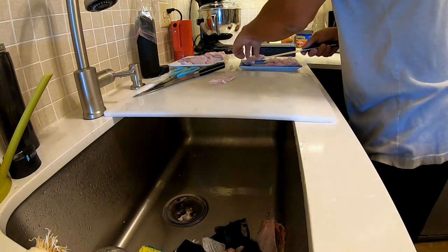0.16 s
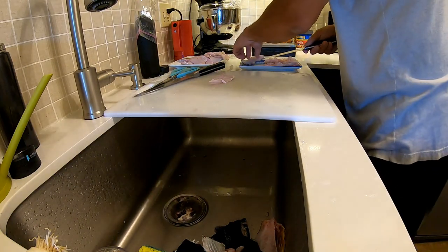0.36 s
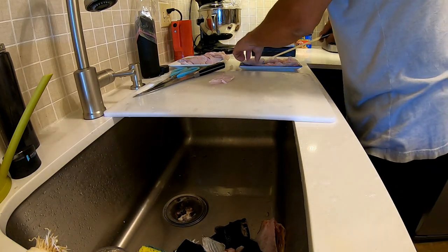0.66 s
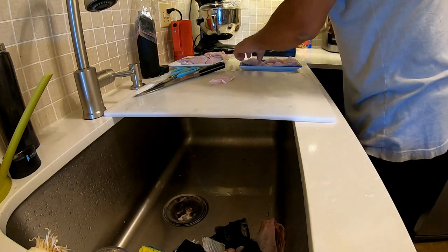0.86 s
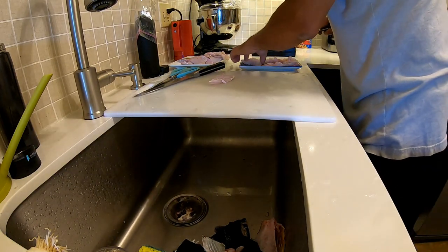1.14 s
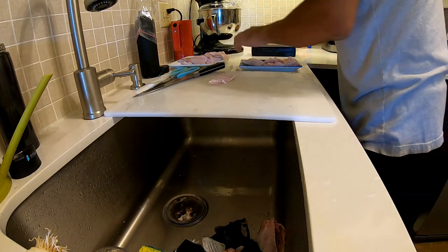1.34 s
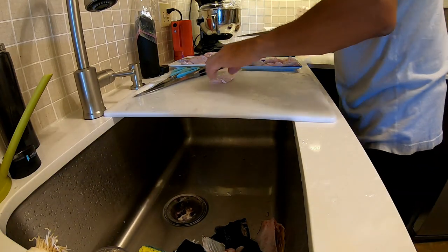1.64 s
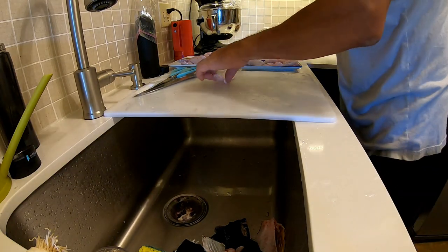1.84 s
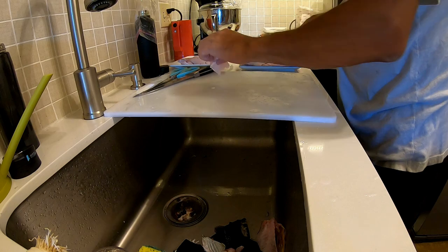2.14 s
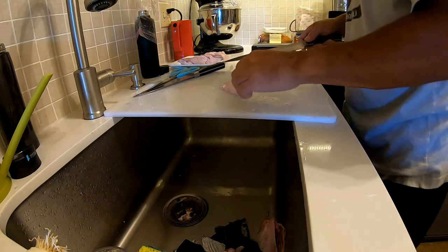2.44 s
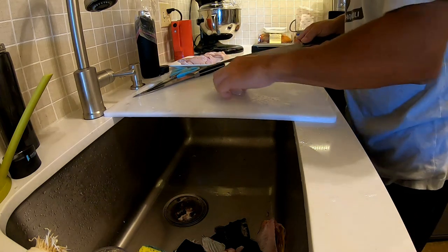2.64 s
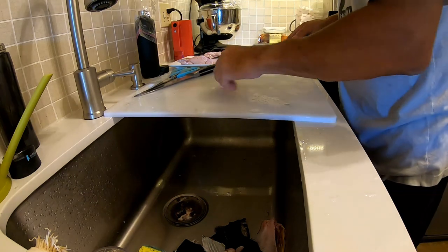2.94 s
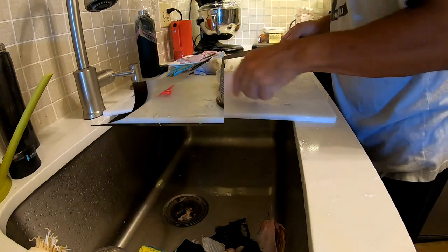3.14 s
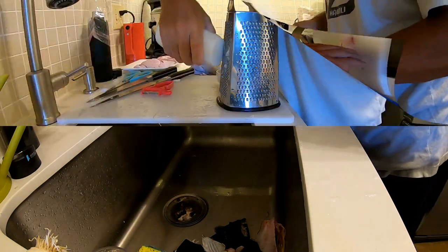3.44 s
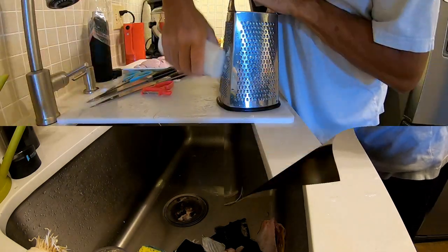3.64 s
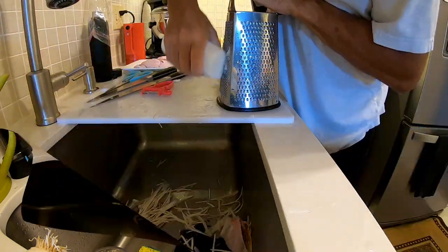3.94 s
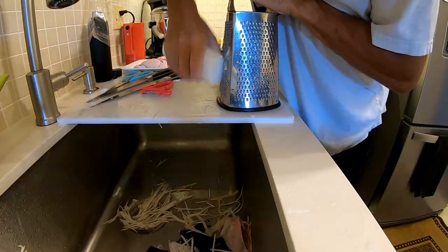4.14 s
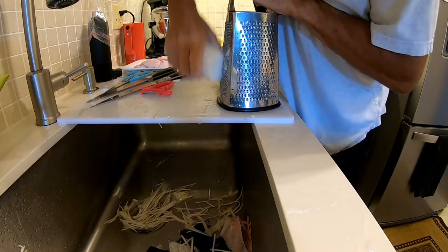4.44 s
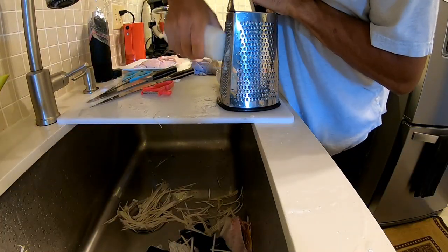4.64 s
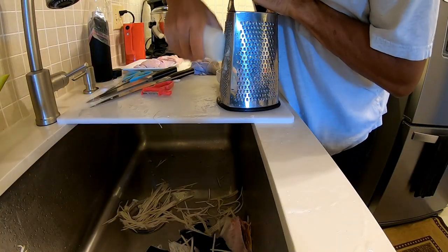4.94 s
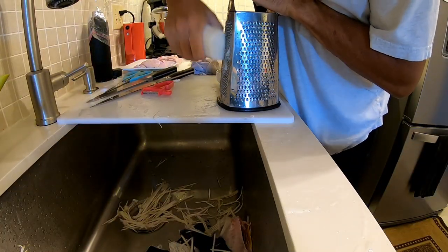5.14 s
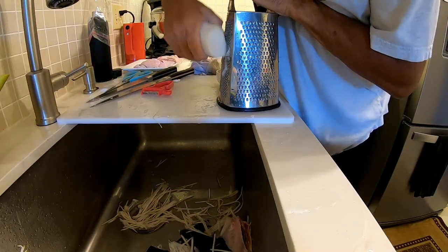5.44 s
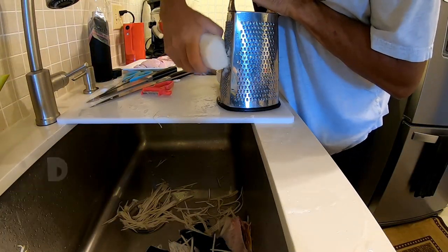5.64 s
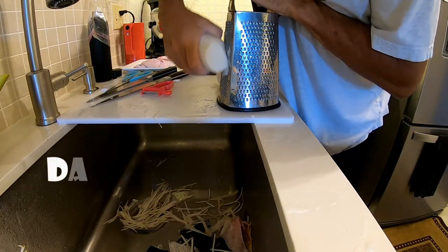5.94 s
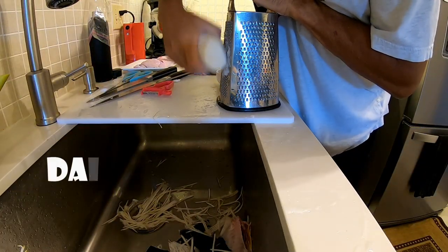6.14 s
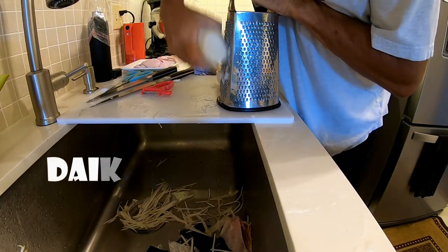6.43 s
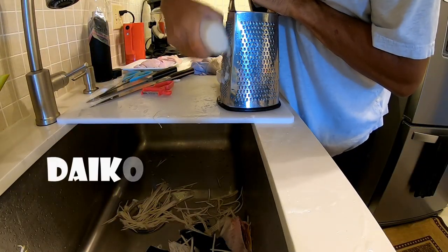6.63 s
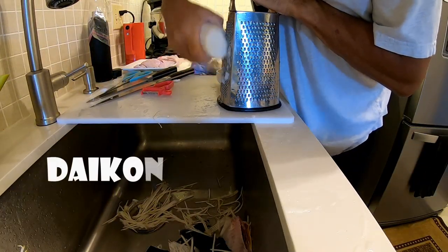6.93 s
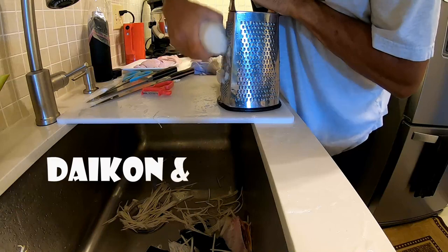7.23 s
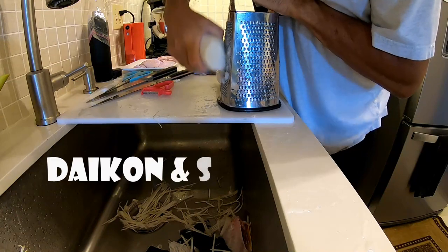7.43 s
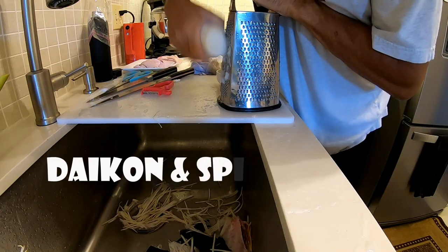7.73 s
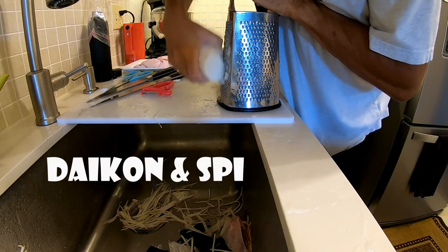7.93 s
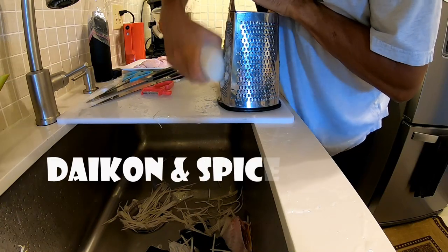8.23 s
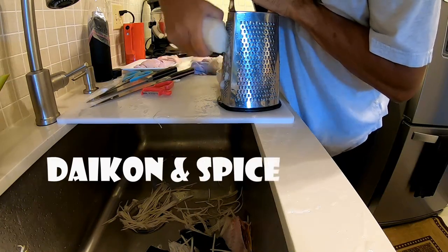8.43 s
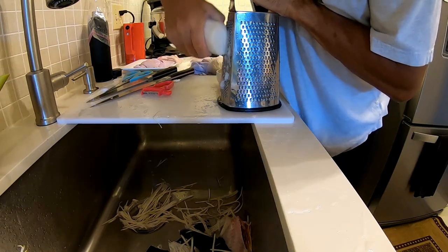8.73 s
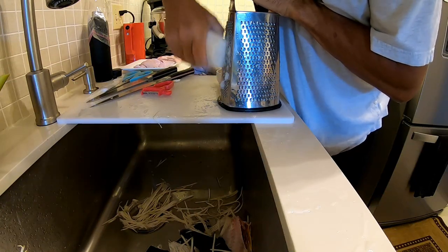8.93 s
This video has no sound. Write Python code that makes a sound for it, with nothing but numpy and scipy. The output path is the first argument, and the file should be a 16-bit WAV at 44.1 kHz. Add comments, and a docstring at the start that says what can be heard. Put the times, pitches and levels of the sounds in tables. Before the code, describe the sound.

A close microphone in a small, tiled kitchen. From 0 to about 3.4 seconds an appliance hums low and slightly wavering, with dull air noise. At 0.2 s something is set down with a short, hard clack; faint dry brushing follows around 0.5 to 0.7 s. Near 1.9 to 2.0 s come a muffled thud and tiny ticks, at 2.4 s another knock, and from 2.8 to 3.0 s a run of soft low bumps as a hand wipes the board. Around 3.4 s the hum drops away and grating begins, first lightly with a brief metallic groan at 3.55 s, reaching full strength by 4 s. Rapid rasping strokes, about seven a second, hiss and ring the sheet metal while the counter shudders beneath. Strokes vary in bite and brightness, with small cracks near 6.25, 7.3 and 8.5 s, continuing to the end around 9.1 s.

```python
"""A radish is rubbed up and down a metal box grater, about seven strokes a second: chance cuts of the
teeth make the hiss, narrow modes ring as sheet metal, and each push shakes low modes of the counter.
Before that, things are set down (decaying noise through modes, over a sine thud) and a hand wipes the
cutting board (band noise and low bumps). An appliance hums: low resonant noise, tones and air noise."""
import sys
import numpy as np
from scipy import signal
from scipy.fft import rfft, irfft, next_fast_len
from scipy.io import wavfile

SR = 44100
rng = np.random.default_rng(int(sys.argv[2]) if len(sys.argv) > 2 else 0)


def generate_wav(sig):
    """Save sig (samples, or channels by samples) to the path in sys.argv[1] as 16-bit PCM at SR."""
    pcm = np.round(np.clip(np.atleast_2d(sig).T, -1, 1) * 32767).astype(np.int16)
    wavfile.write(sys.argv[1], SR, pcm)


N = 400428

# Strokes: turn t/s, level at the turn/dB, level at full speed/dB, place of full speed/0-1,
# body and edge relative to that level/dB, ring level/dB, place of ring peak/0-1,
# push level/dB, place of hardest push/0-1; the last row only ends the last stroke
STROKES = [(3.35, -79, -63.5, 0.65, 7, -9, -61, 0.91, -44, 0.67),
           (3.455, -72, -51, 0.57, 1, -10, -50, 0.49, -41, 0.86),
           (3.603, -69, -49, 0.59, 1, -6.5, -51, 0.56, -34, 0.93),
           (3.748, -68, -47.5, 0.44, 3.5, -5.5, -44.5, 0.39, -38, 0.77),
           (3.887, -62.5, -44, 0.49, 3, -6.5, -50.5, 0.66, -34.5, 1),
           (4.045, -56.5, -40.5, 0.4, -0.5, -7, -38.5, 0.35, -32, 0.93),
           (4.2, -59, -41, 0.53, 3, -6.5, -46.5, 0.7, -32, 0.95),
           (4.343, -53, -42.5, 0.57, 0, -6, -45, 0.56, -28.5, 0.38),
           (4.496, -53, -43, 0.42, 2, -8.5, -43.5, 0.77, -33, 0.83),
           (4.636, -54.5, -43.5, 0.56, 3.5, -3.5, -41.5, 0.65, -31.5, 0.99),
           (4.786, -56.5, -45.5, 0.42, 3, -7, -49, 1, -32, 0.44),
           (4.911, -57.5, -46, 0.66, 0.5, -4.5, -47.5, 0.58, -31, 0.97),
           (5.051, -60, -44.5, 0.51, 6.5, -3, -41.5, 0.64, -33.5, 0.23),
           (5.193, -53, -41, 0.57, -4, -5.5, -51, 0.69, -30, 0.5),
           (5.328, -62, -43, 0.42, 3, -3.5, -41, 0.38, -30.5, 1),
           (5.485, -62, -41.5, 0.51, 1, -6.5, -48, 0.68, -30.5, 0.58),
           (5.634, -81, -42.5, 0.46, 1.5, -4, -51, 0.42, -31, 0.66),
           (5.775, -66, -45.5, 0.32, -3, -4.5, -48.5, 0.43, -38.5, 1),
           (5.916, -75, -44.5, 0.4, 2, -2.5, -53, 0.97, -36.5, 1),
           (6.061, -64.5, -41, 0.52, -5.5, -6, -46, 0.62, -35.5, 0.85),
           (6.218, -66, -41.5, 0.47, 3.5, -4.5, -43, 0.67, -40.5, 0.51),
           (6.36, -54.5, -40.5, 0.53, 0.5, -6, -41.5, 0.44, -33, 0.92),
           (6.515, -57, -44.5, 0.54, 4.5, -2, -43.5, 0.32, -30, 0.47),
           (6.682, -62.5, -42.5, 0.42, 3.5, -1, -38.5, 0.45, -31, 0.67),
           (6.846, -59.5, -42.5, 0.49, 5, -6, -47, 0.58, -30.5, 0.75),
           (6.995, -65, -42.5, 0.37, 1, -2.5, -47, 0.35, -32, 0.69),
           (7.144, -64, -41.5, 0.46, 4.5, -1.5, -41, 0.47, -28.5, 1),
           (7.285, -72, -40, 0.39, 0, -4.5, -43.5, 0.31, -27.5, 0.81),
           (7.428, -58.5, -43.5, 0.49, 3.5, -6.5, -45, 0.65, -34.5, 0.89),
           (7.564, -60, -41.5, 0.38, -4, -5, -44.5, 0.45, -31.5, 0.65),
           (7.698, -60, -45.5, 0.5, 5.5, -5.5, -46, 0.81, -32.5, 0.64),
           (7.822, -62, -44, 0.31, -1.5, -3.5, -49, 0.24, -35, 0.73),
           (7.965, -62.5, -43, 0.42, 7, -2, -36, 0.3, -33.5, 0.19),
           (8.134, -57.5, -45, 0.37, 1.5, -1, -45, 0.23, -31, 1),
           (8.279, -61, -42.5, 0.68, 0.5, -3.5, -41, 0.57, -31, 0.87),
           (8.433, -60.5, -41.5, 0.34, 1.5, -4, -46, 0.4, -33.5, 1),
           (8.598, -56, -45.5, 0.5, 2, -5.5, -45, 0.45, -34, 0.8),
           (8.721, -62, -44.5, 0.42, 0.5, 0, -49, 0.59, -33.5, 0.83),
           (8.882, -64, -45.5, 0.52, 0, -1, -57, 0.37, -40.5, 0.62),
           (9.033, -63, -44, 0.99, -2, 1.5, -48, 0.8, -25.5, 0.74),
           (9.17, -25, -42, 0.5, 0, 0, -48, 0.5, -35, 0.5)]
# Sheet-metal modes of the grater: f/Hz, width/Hz, level/dB
GRATER_MODES = [(512, 22, -1), (652, 12, -6), (740, 31, -1), (955, 36, 2.5), (2086, 130, -6.5),
                (2323, 60, -1), (2600, 39, -6.5), (2946, 45, -3), (3104, 93, -1)]
# Spectrum imposed by the teeth: f/Hz, level/dB
TEETH_SPECTRUM = [(150, -15.5), (250, 0), (500, -4), (960, -10), (1300, -15), (1700, -17.5), (3050, -17),
                  (5000, -22.5), (7880, -26.5), (10800, -32.5)]
# Short boosts of the cutting level, some abrupt onsets, some soft swells:
# t/s, peak level/dB, rise per 20 dB/s (at least 0.001 is used)
BOOSTS = [(3.479, -38, -0.04), (3.632, -30, 0.01), (4.938, -29, .03), (5.3566, -28.5, 0.1),
          (5.5045, -28, 0.07), (5.66, -25, 0.02), (5.9436, -38, 0.1), (6.0906, -34, 0.1),
          (6.248, -28, 0.05), (6.536, -28.5, -0.33), (6.6966, -33, -0.1), (6.894, -24.5, 0),
          (7.0183, -31, .002), (7.1674, -28.5, -0.01), (7.318, -33, 0.26), (7.5832, -30, 0.04),
          (7.721, -32, -0.3), (7.8386, -39, 0.1), (7.982, -33, .002), (8.3108, -29, .004),
          (8.6258, -27.5, -0.75), (8.9135, -35, -0.2)]
BOOST_CREST_DB, BOOST_FADE_S = 19, 0.11   # peak over rms; fade per 20 dB
# One region of the rasp surges as the radish digs in:
# t/s, boost/dB, centre f/Hz, swell per 20 dB/s, fade per 20 dB/s
SURGES = [(3.49, 2, 1890, 0.023, 0.066), (3.79, 4.4, 2300, 0.038, 0.056), (4.145, 3.2, 2370, 0.086, 0.03),
          (4.735, 7.6, 2420, 0.11, 0.075), (4.99, 3.6, 2370, 0.098, 0.041), (5.12, 1.7, 2850, 0.18, 0.07),
          (5.4, 4.2, 610, 0.087, 0.026), (6.6, 4.9, 596, 0.074, 0.11), (6.62, 1.2, 1890, 0.048, 0.038),
          (6.76, 1.4, 3070, 0.098, 0.071), (7.072, 2.7, 2570, 0.023, 0.079),
          (7.223, 1.4, 3700, 0.088, 0.021), (7.32, 1.6, 3030, 0.021, 0.03), (7.865, 1.3, 3050, 0.037, 0.05),
          (8.03, 1.2, 2150, 0.14, 0.033), (8.04, 1.8, 4970, 0.077, 0.058), (8.17, 2, 2900, 0.026, 0.085),
          (8.35, 5, 630, 0.11, 0.038), (8.36, 0.88, 2040, 0.11, 0.039), (8.485, 4.8, 3370, 0.016, 0.038),
          (8.79, 4.7, 3840, 0.069, 0.23)]
SURGE_WIDTH_HZ = 460
# Small sharp cracks, most of them fibres on the teeth: t/s, peak level/dB
SNAPS = [(1.432, -64), (6.253, -27), (7.3175, -32), (8.4805, -21)]
# Strongest pair of sheet modes, flaring with single strokes: f/Hz, width/Hz, level/dB
RING_MODES = [(1394, 43, 4.5), (1441, 36, 7)]
RING_WANDER_DB = 2.5   # each mode of the pair comes and goes on its own
# Sink of ring and push at the turns; the smaller the flatness, the more pointed the swell
RING_DIP_DB, RING_FLATNESS = 18, 0.5
PUSH_DIP_DB, PUSH_FLATNESS, PUSH_WAVER_DB = 5, 0.28, 0.5
# The empty grater groans under the first full stroke; swell and fade per 20 dB
GROAN_HZ, GROAN_S, GROAN_DB, GROAN_SWELL_S, GROAN_FADE_S = 652, 3.555, -43, 0.078, 0.062
# Low resonances of counter and room: f/Hz, width/Hz, hum level/dB, push level/dB
LOW_MODES = [(45, 17, -2, -6), (87.4, 8.3, 0, -3.5), (118.4, 13.9, 1, 2), (176.3, 22, -2.5, -7.5),
             (209, 41, -12, -11.5), (238.44, 8.9, -3, -8.5), (310.4, 18, -10, -9.5),
             (373.5, 13.7, -8, -16.5), (462.7, 23, -11, -21.5)]
# Knocks of things set down, and low bumps while the board is brushed:
# t/s, peak level of middle band/dB, thud/dB, body/dB, edge/dB, rise/s, t60/s, number of the mode set
KNOCKS = [(0.1768, -37.5, -47, -30, -94, 0.0056, 0.2, 0), (0.226, -50.5, -55, -54, -98, 0.0036, 0.17, 0),
          (1.886, -61, -27, -45, -88, 0.0068, 0.24, 1), (1.905, -43, -27, -34, -59, 0.013, 0.14, 1),
          (1.956, -67, -34.5, -51, -55, .0005, 0.11, 3), (1.986, -69, -69, -55, -46.5, .0004, 0.055, 3),
          (2.0023, -68, -70, -61, -49.5, .0004, 0.19, 3), (2.427, -42, -31, -43, -47, 0.0022, 0.13, 2),
          (2.432, -52, -25.5, -52, -51, 0.0044, 0.26, 3), (2.773, -69, -28, -46.5, -74, 0.0018, 0.11, 1),
          (2.857, -58, -32.5, -44, -84, 0.017, 0.2, 1), (2.886, -58, -31, -44.5, -80, 0.003, 0.16, 1),
          (2.916, -59, -30.5, -57, -82, 0.0027, 0.12, 1), (2.946, -68, -34, -60, -82, 0.003, 0.071, 1),
          (2.982, -70, -40, -66, -84, 0.003, 0.059, 1)]
# Mode sets of the knocks: f/Hz, width/Hz, level/dB; the last has none: bare ticks, or a plain thud
OBJECT_MODES = [
    [(645, 140, -4), (785, 110, -3), (1340, 100, -8), (1800, 93, 1.5), (1960, 80, 2), (2230, 99, -5),
     (2585, 70, 3), (3200, 35, 2.5), (3890, 68, -1)],
    [(340, 19, 10), (504, 26, 4.5), (673, 39, 0), (1150, 25, -6), (1550, 90, -14), (2670, 56, -4),
     (3500, 90, -3), (4170, 120, -4), (5400, 590, -1)],
    [(338, 40, 8), (1350, 60, -6), (1910, 45, -7), (2470, 49, -3), (2890, 100, -7), (3850, 50, 2),
     (4060, 80, 2), (5140, 230, 1), (6660, 100, 0)],
    [],
]
# The board gives under each contact
THUD_HZ, THUD_UPPER_HZ, THUD_UPPER_DB, THUD_RISE_S, THUD_T60_S = 140.5, 316, -7, 0.005, 0.042
# Hand and scraps brush the board:
# loudest t/s, dull level/dB, bright level/dB, swell per 20 dB/s, fade per 20 dB/s
BRUSHES = [(.5, -68, -84.5, 0.85, 0.35), (.69, -66, -79, 0.029, 0.096), (1.35, -72, -100, 0.025, 0.11),
           (1.45, -77, -80, 0.061, 0.12), (1.68, -68.5, -76, 0.1, 0.14), (1.95, -69, -66.5, 0.071, 0.2),
           (2.5, -75, -71.5, 0.21, 0.064), (2.63, -75, -74, 0.13, 0.062), (2.778, -66.5, -74, 0.008, 0.23),
           (2.9, -60, -82, 0.11, 0.077), (3.32, -75, -76, 0.27, 0.13)]
# Appliance: t/s, hum level/dB, air noise level/dB, treble hiss level/dB
APPLIANCE_LEVELS = [(0, -46, -54.5, -85), (.33, -42.5, -53.5, -92), (1.3, -45.5, -56, -100),
                    (1.75, -46.5, -57.5, -103), (2.1, -48, -58, -83.5), (2.6, -48.5, -59, -84),
                    (2.95, -46.5, -58.5, -82), (3.2, -55, -58.5, -81), (3.37, -48, -61, -82),
                    (3.5, -77, -92, -93), (3.6, -87, -99, -110)]
HUM_WAVER_DB = 1
# Spectrum of the air noise: f/Hz, level/dB
AIR_SPECTRUM = [(150, 0), (235, 11.5), (266, -4), (357, -6), (695, -22.5), (3620, -41), (6000, -55.5),
                (9000, -97)]
# Motor tones: f/Hz, mean level/dB rms
TONES = [(87.5, -55.5), (119, -55.5), (236.9, -52)]
KITCHEN_DB, KITCHEN_T60_S = -13, 0.18
# Side over mid, before the opening is applied: f/Hz, level/dB
SIDE_SPECTRUM = [(40, -38), (130, -48), (300, -25.5), (600, -15), (1200, -11), (2500, -12), (5000, -8.5),
                 (10500, -2.5)]
# Opening of the stereo image: t/s, side level/dB
OPENING = [(0, -16), (.5, -30), (1.2, -1), (2.0, 6), (3.2, 9), (3.65, -9), (4.5, -7.5), (7.5, -8.5),
           (9.08, 2)]
# Side over mid for the share that does not open and close: f/Hz, level/dB
STEADY_SIDE_SPECTRUM = [(40, -37.5), (150, -57), (300, -59), (600, -48)]
CUTOFF_HZ = 11130   # edge of the stop band


def grater():
    """Impulsive excitation of plate modes: thousands of tiny cuts a second hiss and ring the sheet metal."""
    level, speed, body_db, edge_db = stroke_db(flatness=1.05)
    sizes = from_db(0.39 * rng.exponential(1, N)) * rng.standard_normal(N)
    happens = rng.random(N) < 12000 / SR   # 12000 cuts a second on average
    cuts = rms_one(sizes * happens) * boosted(level + 0.44 * drift(10.2))
    # each mode's drive wavers by chance, several times a second
    drive_db, drive_hz = 3, 9
    metal = sum(resonance(from_db(db + drive_db * drift(drive_hz)) * cuts, hz, width)
                for hz, width, db in GRATER_MODES)
    hiss = coloured(cuts + metal, TEETH_SPECTRUM)
    hiss = hiss + sum(from_db(db) * swell(s, swell_s, fade_s) * resonance(hiss, hz, SURGE_WIDTH_HZ)
                      for s, db, hz, swell_s, fade_s in SURGES)
    # seven bands of the rasp waver in level independently, by chance
    waver_db, waver_hz = 5, 30
    hiss = hiss + sum(from_db(-9.0 + waver_db * drift(waver_hz)) * resonance(hiss, hz, hz / 5)
                      for hz in np.geomspace(600, 5500, num=7))
    body = coloured(hiss, [(900, 0), (1300, -6), (2000, -40)])
    edge = coloured(hiss, [(3000, -40), (4600, -6), (6500, 0)])
    rasp = hiss - body - edge
    rasp_db = 1.1 * drift(12.6) + 0.93 * drift(50)
    body_db = body_db + 0.51 * drift(2.0)
    # the edge level wavers by chance and rises very slightly with speed
    edge_db = edge_db + 0.3 * speed + 0.91 * drift(11.0)
    parts = (rasp, rasp_db), (body, body_db), (edge, edge_db)
    return sum(from_db(db) * part * np.std(cuts) / np.std(part) for part, db in parts)


def stroke_db(flatness):
    """Reciprocating motion: the arm slows to a turn and speeds up again, and the level follows."""
    s, turn_db, full_db, place, body_db, edge_db = np.transpose(STROKES)[:6]
    t = np.arange(N) / SR
    speed, stroke, fastest = arc(place, flatness)
    level = (1 - speed) * np.interp(t, s, turn_db) + speed * full_db[stroke]
    level[t < s[0]] = -120
    return level, speed, np.interp(t, fastest, body_db[:-1]), np.interp(t, fastest, edge_db[:-1])


def arc(place, flatness):
    """A flattened half sine between turns, topped at the given place; also stroke numbers and top times."""
    s = np.array(STROKES)[:, 0]
    tops = s[:-1] + np.clip(place[:-1], .1, .9) * np.diff(s)
    # the phase gains a half from turn to top and a half from top to turn
    phase = np.interp(np.arange(N) / SR, np.sort(np.r_[s, tops]), np.arange(2 * len(s) - 1) / 2)
    shape = np.tanh(flatness * np.abs(np.sin(np.pi * phase))) / np.tanh(flatness)
    return shape, phase.astype(int), tops


def boosted(level_db):
    """Addition of powers: the gain of the cutting with its short boosts."""
    boost = sum(from_db(db - BOOST_CREST_DB) * swell(s, max(rise_s, 1e-3), BOOST_FADE_S)
                for s, db, rise_s in BOOSTS)
    return np.hypot(from_db(level_db), boost)


def snaps():
    """Impulse response: each single sharp crack is a click through a band-pass."""
    clicks = np.zeros(N)
    for s, db in SNAPS:
        clicks[round(s * SR)] = from_db(db)
    impulse = np.eye(1, 400)[0]
    crack = band(band(impulse, 2700, 6500), 2700, 6500)
    return np.convolve(clicks, crack / np.max(np.abs(crack)))[:N]


def ring():
    """Resonance under friction: noise twice through a pair of modes, flaring once in each stroke."""
    drives = rng.standard_normal((len(RING_MODES), N))
    pair = sum(from_db(db + RING_WANDER_DB * drift(23)) * resonance(resonance(drive, hz, width), hz, 8 * width)
               for drive, (hz, width, db) in zip(drives, RING_MODES))
    return per_stroke(*np.transpose(STROKES)[6:8], RING_DIP_DB, RING_FLATNESS) * rms_one(pair)


def per_stroke(top_db, place, dip_db, flatness):
    """Periodic loading: a gain that rises to each stroke's own top and sinks at the turns."""
    shape, _, tops = arc(place, flatness)
    t = np.arange(N) / SR
    started = np.clip((t - STROKES[0][0]) / .03, 0, 1)
    return started * from_db(np.interp(t, tops, top_db[:-1]) - dip_db * (1 - shape))


def groan():
    """Single-mode resonance: noise twice through one narrow mode."""
    tone = resonance(resonance(rng.standard_normal(N), GROAN_HZ, 39), GROAN_HZ, 91)
    return from_db(GROAN_DB) * swell(GROAN_S, GROAN_SWELL_S, GROAN_FADE_S) * rms_one(tone)


def counter():
    """Forced vibration: each stroke pushes into the counter and shakes its low resonances."""
    push = per_stroke(*np.transpose(STROKES)[8:], PUSH_DIP_DB, PUSH_FLATNESS)
    return push * from_db(PUSH_WAVER_DB * drift(24.0)) * lows(column=3, open_db=1.0)


def lows(column, open_db):
    """Modal superposition: noise in low resonances, each heaving on its own, over a broad rumble; rms 1."""
    white = rng.standard_normal(N + SR)   # the first second lets the filters settle
    rings = 0
    for k, row in enumerate(LOW_MODES):
        hz, width = row[:2]
        mode = rms_one(resonance(resonance(white, hz, width), hz, 2 * width))[SR:]
        rings = rings + from_db(row[column] + 1.3 * drift(4.4)) * mode * (-1) ** k
    rumble = rms_one(band(rng.standard_normal(N + SR), 6.7, 159))[SR:]
    return rms_one(rings + from_db(open_db) * rumble)


def knocks():
    """Impact excitation: a dying rattle drives a set of modes, levelled in three bands, over a thud."""
    out, t = np.zeros(N), np.arange(SR // 2) / SR
    thud = np.sin(2 * np.pi * THUD_HZ * t) + from_db(THUD_UPPER_DB) * np.sin(2 * np.pi * THUD_UPPER_HZ * t)
    thud = thud * from_db(-60 * t / THUD_T60_S) * np.minimum(t / THUD_RISE_S, 1)
    for s, db, thud_db, body_db, edge_db, rise, t60, mode_set in KNOCKS:
        rattle = rng.standard_normal(len(t)) * from_db(-60 * t / t60) * np.minimum(t / rise, 1)
        burst = rattle + sum(from_db(13.0 + level_db) * resonance(rattle, hz, width)
                             for hz, width, level_db in OBJECT_MODES[mode_set])
        at = round(s * SR)
        out[at:at + len(t)] += from_db(thud_db) * thud / np.max(np.abs(thud))
        for level_db, low, high in (body_db, 220, 1500), (db, 1500, 4400), (edge_db, 4700, 11000):
            part = band(band(burst, low, high), low, high)
            out[at:at + len(t)] += from_db(level_db) * part / np.max(np.abs(part))
    return out


def wipe():
    """Sliding friction: soft grainy noise in a dull and a bright part."""
    dull_gain, bright_gain = sum(from_db([[dull_db], [bright_db]]) * swell(s, swell_s, fade_s)
                                 for s, dull_db, bright_db, swell_s, fade_s in BRUSHES)
    grain = from_db([2.2 * drift(120), 1.5 * drift(120)])
    dull, bright = rng.standard_normal((2, N)) * grain
    return (dull_gain * rms_one(band(dull, 1100, 3400))
            + bright_gain * rms_one(band(band(bright, 3600, 8400), 3600, 8400)))


def appliance():
    """Resonant and broadband noise: a wavering hum with dull air noise and a faint treble hiss."""
    hum_db, air_db, hiss_db = in_time(APPLIANCE_LEVELS)
    hum = from_db(hum_db + HUM_WAVER_DB * drift(1.6)) * lows(column=2, open_db=-6.5)
    air = coloured(rng.standard_normal(N), AIR_SPECTRUM)
    air = band(air / np.std(band(air, 600, 4000)), 400, 12000)
    hiss = rms_one(band(band(rng.standard_normal(N), 3900, 8400), 3900, 8400))
    return hum + from_db(air_db) * air + from_db(hiss_db) * hiss


def tones():
    """Line spectrum: motor sines that breathe and whose phase wanders slowly."""
    t = np.arange(N) / SR
    return sum(np.sqrt(2) * from_db(db + 1.3 * drift(1.74)) * np.sin(2 * np.pi * hz * t + 1.0 * drift(1.3))
               for hz, db in TONES)


def kitchen(x):
    """Reverberation: tiles and sink send back a short dull tail, here decaying band noise."""
    t = np.arange(SR // 3) / SR
    tail = band(rng.standard_normal(len(t)), 550, 3950) * from_db(-60 * t / KITCHEN_T60_S)
    return x + from_db(KITCHEN_DB) * signal.fftconvolve(x, tail / np.sqrt(np.sum(tail ** 2)))[:N]


def spread(mid):
    """Phase difference: two microphone ports differ by a share, larger in the treble, of wandering phase."""
    opening = from_db(in_time(OPENING)[0])
    side = opening * turned(coloured(mid, SIDE_SPECTRUM), 3 * drift(25))
    side = side + turned(coloured(mid, STEADY_SIDE_SPECTRUM), 3 * drift(4))
    return np.array([mid + side, mid - side])


def turned(x, angle):
    """Phase rotation of the analytic signal by an angle in radians."""
    return np.real(signal.hilbert(x, next_fast_len(N))[:N] * np.exp(1j * angle))


def swell(s, swell_s, fade_s):
    """Exponential growth and decay: a gain that grows up to the moment s and dies after it."""
    t = np.arange(N) / SR - s
    return from_db(20 * np.minimum(t / swell_s, -t / fade_s))


def drift(rate_hz):
    """Low-passed chance: slow random motion of rms 1, computed at every 40th sample."""
    r = np.exp(-80 * np.pi * rate_hz / SR)
    slow = signal.lfilter([1], [1, -2 * r, r * r], rng.standard_normal(N // 40 + 2002))[2000:]
    return np.interp(np.arange(N) / 40, np.arange(len(slow)), rms_one(slow))


def resonance(x, hz, width_hz):
    """A damped mode: two-pole resonator with about unit gain at its peak."""
    r = np.exp(-np.pi * width_hz / SR)
    poles = [1, -2 * r * np.cos(2 * np.pi * hz / SR), r * r]
    return signal.lfilter([(1 - r * r) / 2, 0, (r * r - 1) / 2], poles, x)


def band(x, low_hz, high_hz):
    """Band limitation by a gentle band-pass."""
    return signal.sosfilt(signal.butter(2, [low_hz, high_hz], "band", fs=SR, output="sos"), x + 1e-18)


def coloured(x, points):
    """Spectral shaping by a curve of f/Hz and level/dB, straight over log frequency."""
    size = next_fast_len(N + SR // 2)
    hz = np.maximum(np.arange(size // 2 + 1) * SR / size, 1)
    hz_at, db_at = np.transpose(points)
    gain = from_db(np.interp(np.log(hz), np.log(hz_at), db_at))
    return irfft(rfft(x, size) * gain, size)[..., :N]


def in_time(rows):
    """Linear interpolation of the columns after t/s to one value per sample."""
    s, *columns = np.transpose(rows)
    return [np.interp(np.arange(N) / SR, s, c) for c in columns]


def rms_one(x):
    """Normalisation to rms 1."""
    return x / np.sqrt(np.mean(x ** 2) + 1e-20)


def from_db(db):
    """Amplitude ratio of a level in dB."""
    return 10 ** (np.asarray(db) / 20)


def scene():
    """Superposition of all sources at the two ports; only cutting and cracks excite the room tail."""
    grating = kitchen(grater() + snaps()) + ring() + groan() + counter()
    handling = knocks() + wipe()
    background = appliance() + tones()
    return spread(grating + handling + background)


def record(dry):
    """Low-pass filtering: the top is cut steeply."""
    return signal.sosfilt(signal.cheby2(24, 60, CUTOFF_HZ, fs=SR, output="sos"), dry)


dry = scene()
out = record(dry)
generate_wav(out)
```